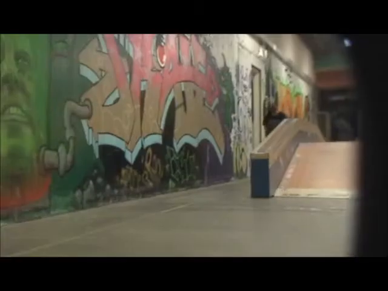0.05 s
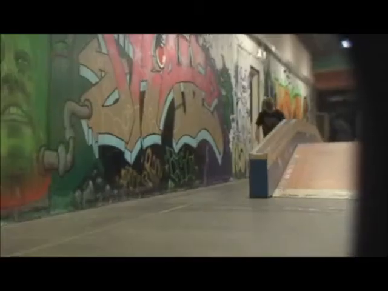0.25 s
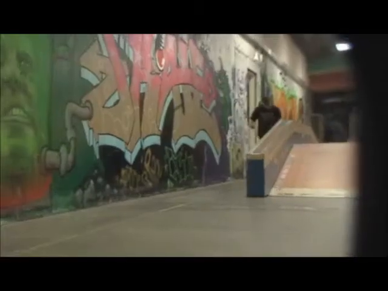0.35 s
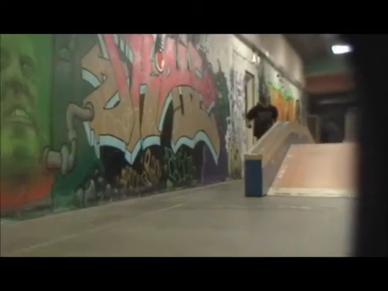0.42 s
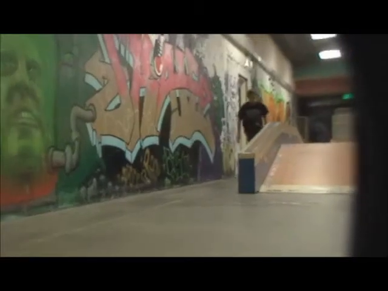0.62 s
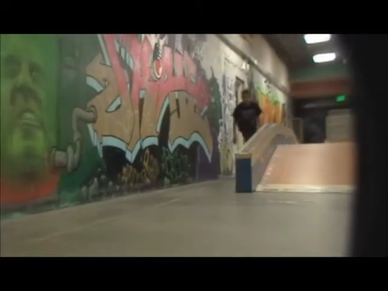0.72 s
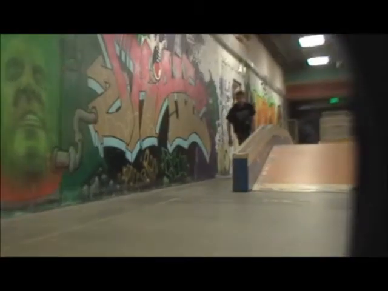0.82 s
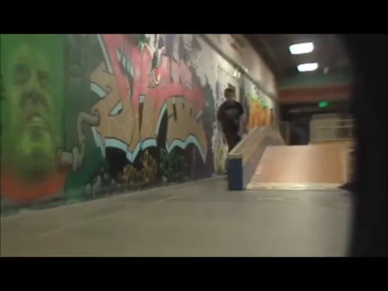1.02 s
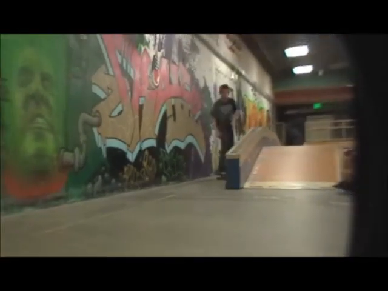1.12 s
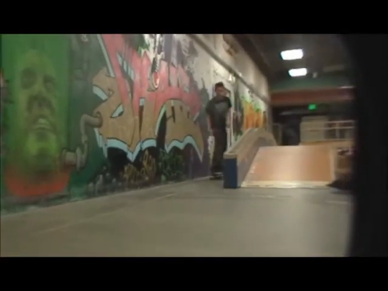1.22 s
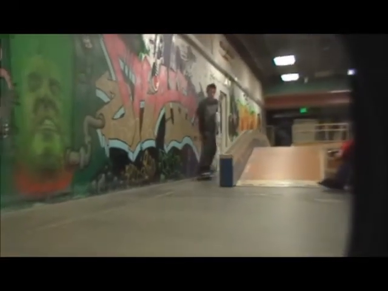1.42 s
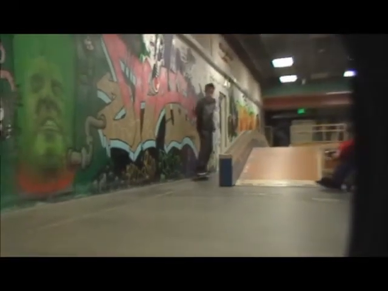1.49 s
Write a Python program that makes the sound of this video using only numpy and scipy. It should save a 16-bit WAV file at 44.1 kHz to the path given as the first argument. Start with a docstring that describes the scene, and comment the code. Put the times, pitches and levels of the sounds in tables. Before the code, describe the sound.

In a reverberant indoor skatepark, a skateboard clatters briefly and lands with a sharp crack and a wooden boom. It rolls off the ramp onto concrete, rumbling more quietly with a faint bearing hiss, heard in narrow stereo.

```python
"""An indoor skatepark, a ringing hall. A skateboard's deck and trucks clack a few times among short
gritty scuffs of shoes and wheels. The wheels slam onto a hollow wooden ramp, whose panel booms and
rings, drum down it across a seam and roll on over concrete with a low rumble and fizzing bearings.
A camera with a narrow stereo image listens."""
import sys
import numpy as np
from scipy import signal
from scipy.fft import rfft, irfft, next_fast_len
from scipy.io import wavfile

SR = 44100
rng = np.random.default_rng(int(sys.argv[2]) if len(sys.argv) > 2 else 0)


def unload_wav(signal):
    """Save mono or channel-first audio to the path in sys.argv[1] as 16-bit WAV at rate SR, clipped to [-1, 1]."""
    wavfile.write(
        sys.argv[1],
        SR,
        np.round(np.clip(np.atleast_2d(signal).T, -1, 1) * 32767).astype(np.int16),
    )


N = 68355
T = np.arange(N) / SR


def amp(db):
    """Decibels to gain."""
    return 10 ** (np.asarray(db) / 20)


def unit_rms(x):
    """x scaled to rms 1."""
    return x / np.sqrt(np.mean(x ** 2) + 1e-20)


def curve_at(points, hz):
    """(freq_hz, value) points read on a log axis."""
    freqs_hz, values = np.transpose(points)
    return np.interp(np.log(hz + 1), np.log(freqs_hz + 1), values)


def envelope(points):
    """Gain per sample from (time_s, level_db) points."""
    return amp(np.interp(T, *np.transpose(points)))


def filtered(x, response):
    """x filtered by a gain function of frequency."""
    size = next_fast_len(N + SR // 2)
    return irfft(rfft(x, size) * response(np.fft.rfftfreq(size, 1 / SR)), size)[..., :N]


def coloured(x, spectrum):
    """x filtered by (freq_hz, gain_db) points."""
    return filtered(x, lambda hz: amp(curve_at(spectrum, hz)))


def noise(spectrum, cutoff_hz=20000):
    """Independent mid and side noise of one colour, low-passed."""
    white = rng.standard_normal((2, N))
    return unit_rms(filtered(
        white, lambda hz: amp(curve_at(spectrum, hz)) / np.sqrt(1 + (hz / cutoff_hz) ** 8)))


def wobble(rate_hz):
    """Random curve through unit-variance knots."""
    return np.interp(T * rate_hz, np.arange(1000), rng.standard_normal(1000))


def burst(start_s, length_s, attack_s=0.00042):
    """Contact envelope: quick rise, brief clatter, fast fall."""
    age_s = np.maximum(T - start_s, 0)
    return (1 - np.exp(-age_s / attack_s)) * np.exp(-(age_s / length_s) ** 2)


def rattling_mode(pitch_hz, age_s, rattle_rad=0.71, rattle_hz=159.9):
    """One mode; loose trucks make its phase waver."""
    return np.sin(2 * np.pi * (pitch_hz * age_s + rng.random()) + rattle_rad * wobble(rattle_hz))


# Hall decay: freq_hz, t60_s
HALL_DECAY = [(100, 0.53), (600, 1.46), (2000, 0.88), (5000, 0.57), (10000, 0.29), (16000, .25)]

def hall(dry, tail_db, near_db=-12, near_t60_s=0.076, direct_side_db=-5.5):
    """Narrowed direct sound, reflections off near walls and the hall's tail, as mid and side."""
    hz, frame_s, spectra = signal.stft(rng.standard_normal((2, SR)), SR, nperseg=256)
    decay = amp(-60 * frame_s / curve_at(HALL_DECAY, hz)[:, None])
    tail = signal.istft(spectra * decay, SR, nperseg=256)[1][:, :SR]
    delay_s = T[:SR]
    longest_t60_s = HALL_DECAY[1][1]
    tail *= (1 - np.exp(-delay_s / 0.0022)) / np.linalg.norm(amp(-60 * delay_s / longest_t60_s))
    near = rng.standard_normal((2, SR)) * amp(-60 * delay_s / near_t60_s) * (delay_s > 0.003)
    response = amp(tail_db) * tail + amp(near_db) * near / np.linalg.norm(near[0])
    direct = dry * amp([[0], [direct_side_db]])
    return direct + signal.fftconvolve(dry[:1], response, axes=1)[:, :N]


# Hall background: freq_hz, gain_db
ROOM_TONE_SPECTRUM = [(30, -14), (70, -16), (235, -9.5), (298, 6), (360, -8), (497, -5), (700, -8.5),
                      (2000, -9.5), (2900, -12), (5000, -13), (5800, -19.5), (15000, -43)]

def room_tone(level_db=-62):
    """Steady background noise of the hall."""
    return amp(level_db) * noise(ROOM_TONE_SPECTRUM)


# Bearing fizz: freq_hz, gain_db
BEARING_SPECTRUM = [(500, -5), (4000, -0.5), (6000, -4.5), (6700, 3), (7400, -6), (10500, -5),
                    (13000, -9.5), (16000, -18)]
# time_s, level_db
BEARING_ENVELOPE = [(0, -78), (.3, -91), (.45, -62), (.72, -66.5), (.82, -55), (1.1, -60), (1.3, -60.5),
                    (1.55, -57)]

def bearing_fizz(flicker_db=2.1, flicker_hz=60.4):
    """Spinning bearings give a flickering hiss."""
    return envelope(BEARING_ENVELOPE) * noise(BEARING_SPECTRUM) * amp(flicker_db * wobble(flicker_hz))


# Rolling rumble: freq_hz, gain_db
RUMBLE_SPECTRUM = [(25, -41), (45, -49), (70, -11.5), (115, 1), (150, 1.5), (185, 0), (235, -2.5),
                   (300, 1.5), (400, -6), (490, -16.5), (800, 3), (3000, -70)]
# time_s, level_db
RUMBLE_ENVELOPE = [(0, -74.5), (.37, -69.5), (.485, -51.5), (.52, -44), (.72, -44), (.9, -38.5),
                   (1.05, -49), (1.25, -50.5), (1.55, -55)]

def wheel_rumble(waver_db=0.51, waver_hz=26):
    """Low, slightly wavering noise of rolling wheels."""
    return envelope(RUMBLE_ENVELOPE) * noise(RUMBLE_SPECTRUM) * amp(waver_db * wobble(waver_hz))


def wheel_bumps(judder_db, judder_hz=70.2, bumps_per_s=2500, spread_db=2.5):
    """The wheels meet countless small bumps, in juddering clumps."""
    hits = rng.random((2, N)) < bumps_per_s / SR
    size_db = spread_db * np.minimum(rng.exponential(size=(2, N)), 4)
    return hits * amp(size_db + judder_db * wobble(judder_hz)) * rng.choice([-1, 1], (2, N))


# Wheels on concrete: freq_hz, gain_db
CONCRETE_SPECTRUM = [(30, -60), (200, -7.5), (300, -5.5), (430, -2), (490, -10.5), (590, 6), (680, 0.5),
                     (790, -11), (1150, -7), (1900, -4.5), (2700, -14), (5000, -22.5), (8000, -30.5),
                     (16000, -47)]
# time_s, level_db
CONCRETE_ENVELOPE = [(0, -66.5), (.22, -63), (.35, -50.5), (.5, -41), (.75, -52), (.85, -44.5),
                     (1.05, -45.5), (1.25, -48.5), (1.35, -46.5), (1.45, -49), (1.55, -45)]

def concrete_roll():
    """Bumps on smooth concrete merge into an even roar."""
    roar = coloured(wheel_bumps(judder_db=0.3), CONCRETE_SPECTRUM)
    return envelope(CONCRETE_ENVELOPE) * unit_rms(roar)


# Wheels on the ramp: freq_hz, gain_db
RAMP_SPECTRUM = [(30, -52), (200, -28), (490, -30), (590, 1), (690, 3.5), (790, -4), (930, -1),
                 (1150, -6.5), (1450, -5.5), (1700, -11.5), (2250, -16), (2900, -28), (5000, -34),
                 (9000, -55), (16000, -69)]
# time_s, level_db
RAMP_ENVELOPE = [(.488, -80), (.5, -29.5), (.6, -34.5), (.69, -34), (.76, -34), (.86, -34), (.96, -42),
                 (1.04, -44.5), (1.13, -56), (1.3, -66)]

def ramp_roll():
    """Bumps drum on the hollow wooden panel and take on its colour."""
    drumming = coloured(wheel_bumps(judder_db=1.7), RAMP_SPECTRUM)
    return envelope(RAMP_ENVELOPE) * unit_rms(drumming)


# Grit: freq_hz, gain_db
GRIT_SPECTRUM = [(300, -58), (3000, 2.5), (5500, -6), (8300, -1.5), (11500, -5), (13500, -16), (16000, -24)]
# Scuffs: centre_s, half_length_s, level_db
SCUFF_EVENTS = [(.016, 0.0063, -61.5), (0.05, 0.029, -61), (0.251, 0.0056, -43.5), (.327, 0.0057, -41.5),
                (0.385, 0.0095, -43), (0.398, 0.02, -49), (0.45, 0.01, -50), (0.536, .009, -51.5),
                (0.659, 0.0043, -57), (0.789, 0.0064, -48), (1.3, 0.052, -58)]

def scuffs():
    """Shoes and wheels scrape in brief swells of bright grit."""
    swells = sum(amp(level_db) * np.exp(-((T - centre_s) / half_length_s) ** 2)
                 for centre_s, half_length_s, level_db in SCUFF_EVENTS)
    return swells * noise(GRIT_SPECTRUM)


# Deck modes: pitch_hz, t60_s, edge_db, truck_db, flat_db
DECK_MODES = [(302.3, 0.13, -5, -13, 2.5), (720, 0.12, -12, 2, -12.5), (933, 0.064, 2, -33, -1.5),
              (1010, 0.12, 2, -20, -31), (1137, 0.12, -9, 4, -7), (1405, 0.074, -29, -11, -1),
              (1678, 0.088, 1, -26, -30), (1925, 0.14, -6.5, -12, -0.5), (2420, 0.045, 3, 10, -27),
              (2480, 0.12, -6, -13, -9), (3254, 0.053, -18, 5, -2), (3590, 0.04, 1, 5, -12),
              (4220, .045, 0, -6, -32)]
# Struck spots, in the order of those level columns: spot
DECK_SPOTS = ["edge", "truck", "flat"]

def deck_ring(start_s, spot):
    """The spot struck sets how strongly each deck mode rings."""
    age_s = np.maximum(T - start_s, 0)
    column = DECK_SPOTS.index(spot)
    modes = sum(amp(spot_db[column] - 60 * age_s / t60_s) * rattling_mode(pitch_hz, age_s)
                for pitch_hz, t60_s, *spot_db in DECK_MODES)
    return modes * (1 - np.exp(-age_s / 0.0013))


# Clack: freq_hz, gain_db
CLACK_SPECTRUM = [(40, -42), (130, -25), (260, -3.5), (480, -21.5), (720, 1), (1050, -1), (2300, 1),
                  (4000, -2), (16000, -43)]
# Board knocks: start_s, clack_db, cutoff_hz, length_s, ring_db, spot
BOARD_KNOCKS = [(0.042, -43, 1740, .009, -54, "edge"), (0.2418, -34.5, 3850, 0.012, -41.5, "edge"),
                (0.317, -37.5, 4460, 0.013, -43.5, "truck"), (0.3702, -39.5, 2500, 0.031, -49, "truck"),
                (0.3877, -31, 2580, 0.019, -31.5, "flat"), (0.448, -33.5, 2370, 0.0085, -53, "flat")]

def board_knock(start_s, clack_db, cutoff_hz, length_s, ring_db, spot):
    """Trucks and wood clatter briefly; the deck rings on."""
    clack = amp(clack_db) * burst(start_s, length_s) * noise(CLACK_SPECTRUM, cutoff_hz)
    ring = amp(ring_db) * deck_ring(start_s, spot)
    return clack + np.outer([1, 0.5], ring)  # mid, side


# Ramp panel modes: pitch_hz, level_db
PANEL_MODES = [(608, -5.5), (692, 3), (942, -11)]

def panel_ring(start_s, gain_db=-2.5, t60_s=0.18):
    """The struck panel's modes die away together."""
    age_s = np.maximum(T - start_s, 0)
    modes = sum(amp(level_db) * rattling_mode(pitch_hz, age_s) for pitch_hz, level_db in PANEL_MODES)
    return modes * (1 - np.exp(-age_s / 0.003)) * amp(gain_db - 60 * age_s / t60_s)


# Wheel crack: freq_hz, gain_db
CRACK_SPECTRUM = [(30, -27), (70, -24), (150, 2), (260, 6), (450, -19), (700, -28), (1400, 0.5), (2600, 0),
                  (5500, -5.5), (9000, -13), (12500, -19), (16000, -30)]
# Landing, rear wheels and seams: start_s, crack_db, crack_length_s, boom_db
WHEEL_BLOWS = [(0.4907, -19.5, 0.0071, -29), (0.526, -40, 0.013, -30.5), (0.548, -59, .006, -33),
               (0.577, -42, 0.0032, -40), (0.592, -48, .005, -34.5), (.656, -48, 0.0086, -34.5),
               (0.727, -61, 0.0034, -46.5), (0.753, -46, 0.0068, -42), (0.784, -40.5, 0.026, -37),
               (0.819, -44.5, 0.016, -44), (0.878, -52, 0.015, -41), (0.975, -48.5, 0.022, -51)]

def wheel_blows(boom_lag_s=0.00295, boom_length_s=0.015):
    """Hard wheels crack on the ramp; its panel booms just after and rings on."""
    crack_gain, boom_gain, ring = np.zeros((3, N))
    for start_s, crack_db, crack_length_s, boom_db in WHEEL_BLOWS:
        crack_gain += amp(crack_db) * burst(start_s, crack_length_s)
        boom_gain += amp(boom_db) * burst(start_s + boom_lag_s, boom_length_s)
        ring += amp(boom_db) * panel_ring(start_s + boom_lag_s)
    crack = crack_gain * noise(CRACK_SPECTRUM)
    boom = boom_gain * noise(RAMP_SPECTRUM)
    return crack + boom + np.outer([1, 0], ring)  # ring in mid only


# Stereo width: freq_hz, side_gain_db
STEREO_WIDTH = [(60, -33), (250, -14), (600, -12.5), (1100, -7), (2500, -10), (4800, -9), (6200, -13),
                (9000, -26), (12500, -8)]
# Stereo balance: freq_hz, left_over_right_db
STEREO_BALANCE = [(100, 1.9), (280, 0.8), (600, -0.7), (2200, -2), (4500, -2), (9000, 0.5)]

def scene():
    """All sources in the hall, spread a little between left and right."""
    rolling = bearing_fizz() + wheel_rumble() + concrete_roll() + ramp_roll()
    mid, side = (room_tone()
                 + hall(rolling, tail_db=-5)
                 + hall(scuffs(), tail_db=-6.5)
                 + sum(hall(board_knock(*knock), tail_db=-8.5) for knock in BOARD_KNOCKS)
                 + hall(wheel_blows(), tail_db=-5))
    side = coloured(side, STEREO_WIDTH)
    left_right = np.array([mid + side, mid - side])
    return filtered(left_right, lambda hz: amp(np.outer([0.5, -0.5], curve_at(STEREO_BALANCE, hz))))


def record(dry, soft_limit=0.185, low_cut_hz=55, top_hz=15900):
    """The camera rounds off peaks, thins the deep bass and cuts everything above its band."""
    rounded = dry / (1 + np.abs(dry / soft_limit) ** 6) ** (1 / 6)
    thinned = signal.sosfilt(signal.butter(2, low_cut_hz, "high", fs=SR, output="sos"), rounded)
    return filtered(thinned, lambda hz: hz < top_hz)


dry = scene()
out = record(dry)
unload_wav(out)
```